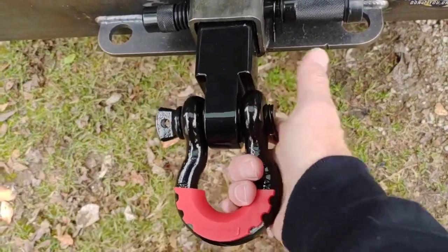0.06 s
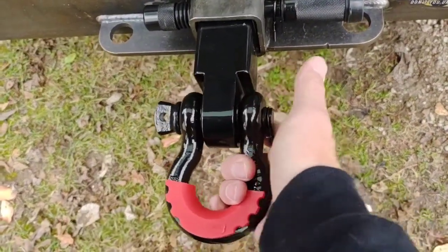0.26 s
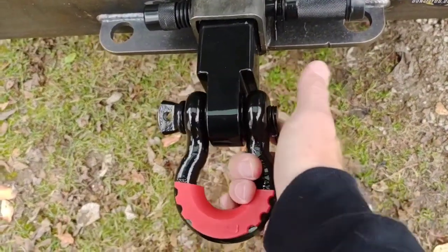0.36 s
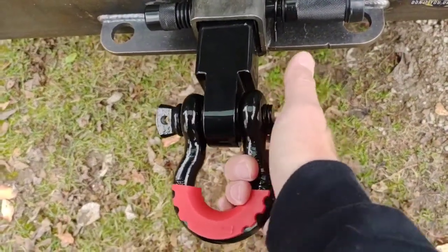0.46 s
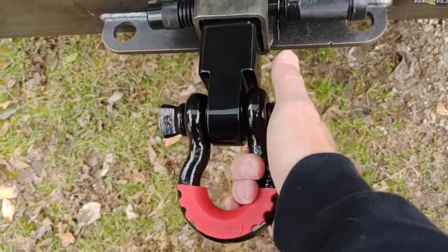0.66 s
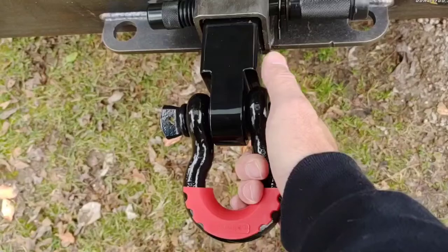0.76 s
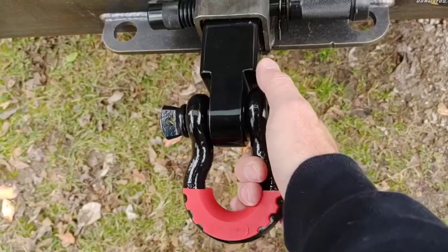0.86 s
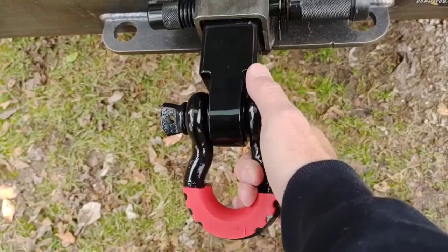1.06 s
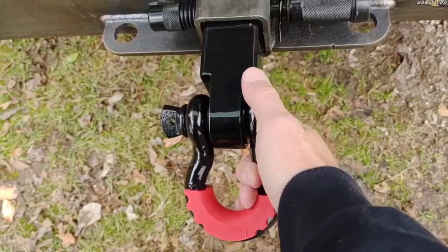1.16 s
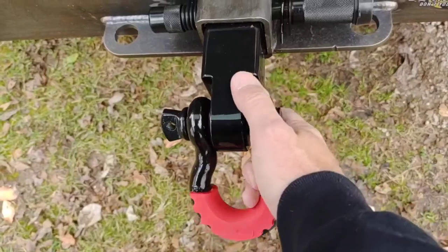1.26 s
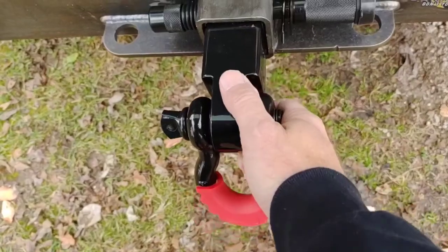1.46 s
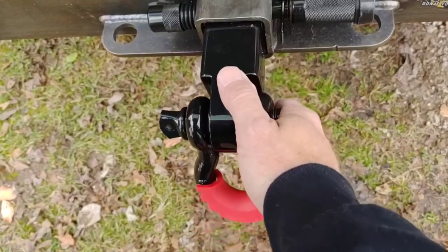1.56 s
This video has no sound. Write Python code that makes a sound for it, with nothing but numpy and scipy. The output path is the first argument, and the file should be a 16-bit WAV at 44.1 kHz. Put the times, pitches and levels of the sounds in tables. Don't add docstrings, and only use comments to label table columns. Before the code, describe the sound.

Heavy steel shackle clunks and rattles against a hitch on a hollow bumper, then is gripped quiet outdoors

```python
import sys
import numpy as np
from scipy import signal
from scipy.fft import rfft, irfft
from scipy.io import wavfile
from scipy.ndimage import uniform_filter1d

SR = 44100
rng = np.random.default_rng(int(sys.argv[2]) if len(sys.argv) > 2 else 0)


def volts_from_decibels(level):
    exponent = np.asarray(level, float) / 20
    return 10 ** exponent


def persist_wave(psi):
    counts = np.round(np.clip(psi, -1, 1) * 32767).astype(np.int16)
    wavfile.write(sys.argv[1], SR, np.atleast_2d(counts).T)


N = 70560

# (frequency [Hz], density [dB per Hz])
AIR_SPECTRUM = [(15, -64), (25, -53), (75, 1.5), (342, -11), (391, -21), (424, -20.5), (670, -19.5),
                (831, -21), (15700, -49.5)]
# (frequency [Hz], correlation [-1 to 1])
AIR_LIKENESS = [(60, 0.71), (240, 0.43), (950, 0.086), (3770, -0.21), (15000, 0.15)]
# (frequency [Hz], left over right [dB])
AIR_BALANCE = [(60, 11), (240, 0.5), (950, -3.5), (3770, -2), (15000, -2.5)]
# (time [s], level [dB], start pitch [Hz], end pitch [Hz])
CHIRPS = [
    (1.112, -84, 7330, 7260),
    (1.123, -78, 6300, 7420),
    (1.135, -75.5, 7280, 7760),
    (1.199, -79, 6060, 7400),
    (1.211, -77, 7350, 7560),
    (1.221, -83, 7440, 8200),
    (1.235, -83, 7350, 7380),
]
# (time [s], level [dB], centre
# [Hz], width [Hz], t60 [s])
GRIT_SPRAYS = [(0.128, -76, 7400, 8000, 0.051), (0.201, -83.5, 9600, 1500, 0.021),
               (.226, -78, 10130, 1200, 0.061), (0.371, -70, 10600, 9000, 0.022),
               (.375, -76.5, 8380, 500, 0.047), (0.447, -69.5, 8350, 9000, 0.18),
               (0.454, -66, 14200, 1800, 0.077), (0.531, -70.5, 7000, 16400, 0.012),
               (0.477, -84.5, 14600, 900, .08), (0.56, -77.5, 9860, 9100, 0.029),
               (0.665, -75, 3600, 2470, .06), (.228, -70, 3300, 2600, 0.076),
               (0.371, -65, 3500, 2400, 0.079), (.464, -58, 3200, 2600, .07), (.560, -53, 3500, 2400, .07),
               (.760, -62.5, 2200, 1210, 0.067)]
# (time [s], level [dB], centre [Hz], left over right [dB])
TICKS = [(0.167, -51, 2320, -14), (0.201, -52.5, 2170, -27), (.452, -62, 11600, -8), (.456, -61, 14000, -8),
         (0.468, -50, 5000, -10.5), (.5315, -58.5, 4540, -9.5), (0.5306, -56, 11000, -12),
         (0.56, -62.5, 9000, -6.5), (.676, -47, 2960, -17), (1.0006, -47.5, 1410, 15.5),
         (1.0008, -63, 3150, 11), (1.279, -54, 1300, 12)]
# (time [s], panel level [dB], frame level [dB])
THUDS = [(0.028, -54, -55), (0.118, -58, -72), (0.1698, -41.5, -51.5), (0.191, -40.5, -42),
         (.206, -38, -36), (0.242, -42, -38.5), (0.259, -49, -39), (0.288, -57, -48.5), (0.339, -45, -44.5),
         (0.371, -40.5, -62), (0.401, -40, -36.5), (.426, -41, -46.5), (0.466, -29, -26), (0.488, -39, -45),
         (.512, -40, -30.5), (.538, -40.5, -50.5), (.562, -36, -41), (0.581, -34.5, -38.5),
         (0.63, -43, -37), (0.661, -44.5, -35.5), (0.693, -45.5, -48), (0.734, -47.5, -36),
         (0.774, -43.5, -39.5), (0.998, -63, -55), (1.28, -68, -55.5)]
# (frequency [Hz], level [dB], t60 [s])
PANEL_MODES = [(226, -8, 0.12), (288.5, 5.5, 0.09), (313.7, -0.5, 0.24), (423.3, -7.5, 0.25),
               (490.6, -8.5, 0.16)]
# (frequency [Hz], level [dB], t60 [s])
FRAME_MODES = [(62, -44.5, 0.17), (79, -9, 0.46), (114.8, -2, 0.19), (158.3, -3, 0.21), (190, -15, 0.052)]
# (frequency [Hz], level [dB], t60 [s])
PIN_MODES = [(859, 0, .38), (1168, 0, .55), (1157, -12, .5)]
# (time [s], low note level [dB], high pair level [dB])
PIN_HITS = [
    (.200, -60, -62),
    (.238, -43, -53),
    (.372, -41, -49),
    (.461, -43, -46),
    (.561, -41, -40),
    (.763, -43, -54),
]
# (time [s], strength [dB], contact time [ms], seating time [s], shackle ring level [dB])
KNOCKS = [(.030, -66, 1, 0.0037, -17), (.118, -38, 1, 0.0026, -24), (.130, -67, 0.21, .003, -7),
          (.170, -34.5, 0.69, 0.025, -13), (.200, -44.5, 0.33, 0.0022, -8),
          (0.225, -32.5, 0.23, 0.0018, -5.5), (.241, -38, 0.85, 0.0026, -10), (.234, -22.5, 1, 0.0031, -10),
          (0.252, -64, 0.24, 0.0037, -13), (0.369, -21.5, 0.23, 0.0029, -5),
          (.448, -32.5, 0.11, 0.0015, -7), (.452, -26, 0.16, 0.0019, -8.5), (.458, -30, 0.26, 0.0012, -17),
          (.463, -24.5, 0.3, 0.0011, -21.5), (.468, -31.5, 0.13, 0.002, 2),
          (0.487, -20, 0.74, 0.011, -18.5), (0.5585, -18.5, 0.24, 0.0016, -4),
          (.566, -42, 0.084, 0.00069, 2), (.648, -25.5, 0.69, 0.0068, -8), (.670, -41.5, 0.25, 0.0028, -12),
          (.688, -52, 1, 0.0045, -22), (.737, -44, 0.11, 0.0032, -16), (0.759, -25, 0.48, 0.0015, -4.5)]
SHACKLE_HZ = [648, 943, 1002, 1319, 1453, 1590, 1834, 1975, 2263, 2423, 2942, 3570, 3900, 4409]
# (level [dB], t60 [s])
SHACKLE_DECAYS = [(-16, 0.53), (-13.5, 0.35), (-14.5, .3), (-8, 0.16), (-12, 0.12), (-11, 0.25),
                  (-15, 0.19), (-12, 0.21), (-12, 0.2), (-14.5, 0.31), (-16.5, 0.15), (-8.5, 0.13),
                  (-14, 0.086), (-16.5, 0.072)]
# (frequency [Hz], level [dB], t60 [s])
BLOCK_MODES = [(500, -10, 0.044), (621.2, -7.5, 0.11), (734.5, 6.5, 0.034), (1100, 4, 0.031),
               (1371, -8, 0.051), (1612, -5, 0.041), (1790, -8, 0.029), (2070, -15.5, 0.067),
               (2448, -20, 0.14), (2920, -50.5, 0.11), (3820, -25, 0.059), (4260, -31, 0.052),
               (5400, -34, 0.053)]
# (frequency [Hz], level [dB], t60 [s])
ROCKING_MODES = [(944, 1.5, 0.073)]
# (start time [s], end time [s])
ROCKING_SPANS = [
    (.22, .26),
    (.44, .5),
    (.64, .7),
]
# (frequency [Hz], density [dB per Hz])
SCATTER_SPECTRUM = [(260, -39), (450, -14.5), (853, -3.5), (1660, -23), (2470, -24.5), (2990, -29),
                    (3890, -29), (6340, -45.5), (9000, -56.5), (11700, -84), (19800, -120)]

STEEL_PAN_DB = -4.5
GRIP_S = 0.818


def evened(x):
    return x / np.sqrt(np.mean(x ** 2) + 1e-20)


def read(points, hz):
    f, value = np.transpose(points)
    return np.interp(np.log(hz + 1), np.log(f + 1), value)


def add(mix, s, sound):
    part = mix[:, max(round(s * SR), 0):][:, :sound.shape[1]]
    part += sound[:, :part.shape[1]]


def sides(pan_db):
    return volts_from_decibels(np.array([[.5], [-.5]]) * pan_db)


def ring(modes, side_share, size):
    spread_db, side_spread_db, side_turn = 1.5, 2.5, 1.43
    wander = 0.79
    phase_shake = .12
    hz, db, t60 = np.transpose(modes)[:, :, None]
    t = np.arange(size) / SR
    level_draw, lean_draw, turn_draw, phase_draw = rng.standard_normal((4, len(modes), 1))
    k = np.arange(len(modes))[:, None]
    envelope = volts_from_decibels(db + spread_db * level_draw - 60 * t / np.maximum(t60, .005))
    wave = envelope * np.exp(2j * np.pi * (hz * t + phase_shake * phase_draw))
    lean_db = side_spread_db * (np.sin(k ** 2) + wander * lean_draw)
    turn = side_turn * (1 + np.cos(k ** 2) + wander * turn_draw) * np.sqrt(hz / 700)
    ears = []
    for ear in (.5, -.5):
        weight = volts_from_decibels(ear * side_share * lean_db) * np.exp(1j * ear * side_share * turn)
        ears.append((weight[:, 0] @ wave).imag)
    return np.array(ears)


def burst(gain, t60, same, size):
    spectrum = rfft(rng.standard_normal((2, size))) * gain(np.fft.rfftfreq(size, 1 / SR))
    noise = irfft(spectrum)
    return evened(noise + same * noise[::-1]) * volts_from_decibels(-60 * np.arange(size) / SR / max(t60, .004))


def air():
    level_db, patch_db, gust_db, settle_db_per_s = -64.5, 1.0, 1.3, -4
    lead_db, lead_s = -7.5, 0.13
    frames, hz = N // 256 + 5, np.fft.rfftfreq(1024, 1 / SR)
    a, b, c, d, patches = rng.standard_normal((frames, 513, 5)).T
    patches = uniform_filter1d(uniform_filter1d(patches, size=10, axis=0), size=10, axis=1)
    gust = evened(uniform_filter1d(rng.standard_normal((2, 1, frames)), size=5, axis=2))
    same = np.clip(read(AIR_LIKENESS, hz), -1, 1)[:, None]
    left = a + 1j * b
    right = same * left + np.sqrt(1 - same ** 2) * (c + 1j * d)
    low = 1 / (1 + (hz[:, None] / 350) ** 2)
    balance = np.array([.5, -.5])[:, None, None] * read(AIR_BALANCE, hz)[:, None]
    colour_db = read(AIR_SPECTRUM, hz)[:, None] + patch_db * evened(patches) + gust_db * gust * low + balance
    z = np.array([left, right]) * volts_from_decibels(colour_db)
    wash = evened(signal.istft(z, nperseg=1024, noverlap=768)[1][:, :N])
    t = np.arange(N) / SR
    still = volts_from_decibels(lead_db * np.exp(-(t / lead_s) ** 4))
    return still * volts_from_decibels(level_db + settle_db_per_s * (t - 2.5)) * wash


def bird():
    syllable_s, pan_db, echo_db, echo_t60 = .016, -11.5, -2, 0.39
    out, u = np.zeros((2, N)), np.linspace(0, 1, round(syllable_s * SR))
    for s, db, hz0, hz1 in CHIRPS:
        flutter = 800 * uniform_filter1d(rng.standard_normal(len(u)), size=40)
        turns = np.cumsum(hz0 + (hz1 - hz0) * u + flutter) / SR
        whistle = np.sin(np.pi * u) * np.sin(2 * np.pi * turns)
        add(out, s, volts_from_decibels(db + 4.0) * sides(pan_db) * whistle)
    tail = rng.standard_normal((2, 6000)) * volts_from_decibels(-60 * np.arange(6000) / SR / echo_t60)
    echo = signal.fftconvolve(out, tail / np.linalg.norm(tail[0]), axes=1)[:, :N]
    return out + volts_from_decibels(echo_db) * echo


def spray(db, hz, width_hz, t60):
    grain_db, pan_db = 4.5, -9
    grain = volts_from_decibels(grain_db * evened(uniform_filter1d(rng.standard_normal(5000), size=70)))
    puff = burst(lambda f: np.exp(-(2 * (f - hz) / width_hz) ** 2), t60, 0.17, size=5000)
    return volts_from_decibels(db) * sides(pan_db) * grain * puff


def tick(db, hz, pan_db):
    cycles = 5.15
    turns = np.arange(400) / SR * hz
    envelope = volts_from_decibels(db + 8 - 60 * turns / cycles) * (1 - np.exp(-2 * turns)) ** 2
    return sides(pan_db) * envelope * np.sin(2 * np.pi * turns)


def thud(panel_db, frame_db):
    rumble_db, rumble_t60, rise_s = -9, 0.8, 0.0015
    body = volts_from_decibels(panel_db) * ring(PANEL_MODES, 0.46, size=9000)
    body += volts_from_decibels(frame_db) * ring(FRAME_MODES, 0.63, size=9000)
    rumble = burst(lambda hz: hz / (hz + 60) / (1 + (hz / 450) ** 3), rumble_t60, 0.29, size=9000)
    body += volts_from_decibels(panel_db + rumble_db) * rumble
    return body * (1 - np.exp(-np.arange(9000) / SR / rise_s))


def pin():
    rise_s = .008
    out, t = np.zeros((2, N)), np.arange(20000) / SR
    ends = [row[0] for row in PIN_HITS[1:]] + [9]
    for (s, low_db, high_db), end in zip(PIN_HITS, ends):
        modes = np.array(PIN_MODES) + np.outer([low_db, high_db, high_db], [0, 1, 0])
        hold = (1 - np.exp(-t / rise_s)) * np.exp(-np.maximum(t - end + s, 0) / rise_s)
        add(out, s, sides(STEEL_PAN_DB) * ring(modes, .3, size=20000) * hold)
    return out


def push(ms):
    turn = np.clip(np.arange(400) / (SR * max(ms, .02) / 1000), 0, 1)
    w = np.sin(np.pi * turn) ** 2 + 1e-9
    return w / w.sum()


def knock(rocking, db, contact_ms, seat_s, ring_db):
    scatter_db, scatter_t60 = -5.5, 0.2
    block_swell = 1.52
    u = np.arange(14000) / SR / max(seat_s, .0005)
    rise = 1 - np.exp(-u)
    swell = (1 - np.exp(-u[:6000] / block_swell)) ** 2
    scatter = burst(lambda hz: volts_from_decibels(read(SCATTER_SPECTRUM, hz)), scatter_t60, 0.17, size=6000)
    clank = 2 * swell * ring(BLOCK_MODES + ROCKING_MODES * rocking, 0.63, size=6000)
    clank += volts_from_decibels(scatter_db) * scatter * rise[:6000]
    long_ring = volts_from_decibels(ring_db) * rise * ring(np.c_[SHACKLE_HZ, SHACKLE_DECAYS], 0.73, size=14000)
    gain = volts_from_decibels(db - 6.0) * sides(STEEL_PAN_DB)
    force = push(contact_ms)[None]
    return [gain * signal.fftconvolve(part, force, axes=1) for part in (long_ring, clank)]


def grip(db):
    return volts_from_decibels(db * np.clip((np.arange(N) / SR - GRIP_S) / 0.01, 0, 1))


def scene():
    shackle, block, bumper, grit = np.zeros((4, 2, N))
    for s, *row in KNOCKS:
        rocking = any(a < s < b for a, b in ROCKING_SPANS)
        long_ring, clank = knock(rocking, *row)
        add(shackle, s, long_ring)
        add(block, s, clank)
    for s, *row in THUDS:
        add(bumper if s < GRIP_S else grit, s, thud(*row))
    for s, *row in TICKS:
        add(grit, s, tick(*row))
    for s, *row in GRIT_SPRAYS:
        add(grit, s, spray(*row))
    steel = shackle * grip(-6) + block * grip(-10) + pin() * grip(-5)
    return steel + bumper * grip(-11) + grit + bird() + air()


def roll_off(x):
    return signal.sosfilt(signal.butter(12, 15850, fs=SR, output="sos"), x)


def record(dry):
    x = signal.sosfilt(signal.butter(3, 64.4, "high", fs=SR, output="sos"), dry)
    x = signal.oaconvolve(x, signal.firwin(255, 15900, fs=SR)[None], "same")
    return roll_off(x)


dry = scene()
out = record(dry)
persist_wave(out)
```